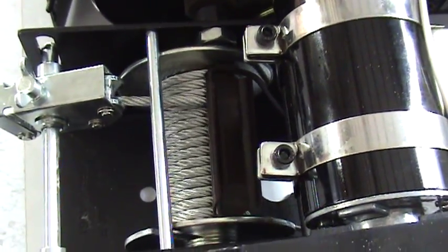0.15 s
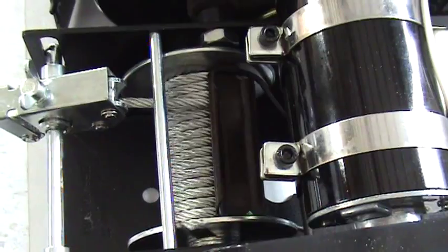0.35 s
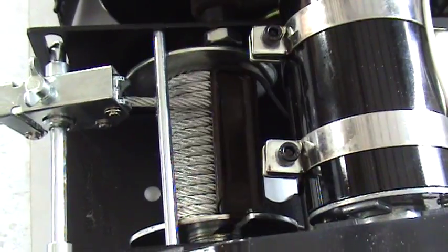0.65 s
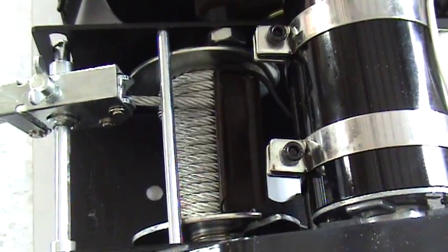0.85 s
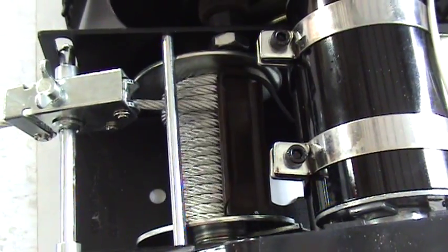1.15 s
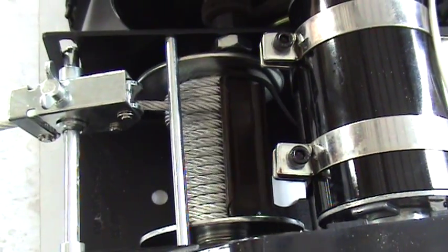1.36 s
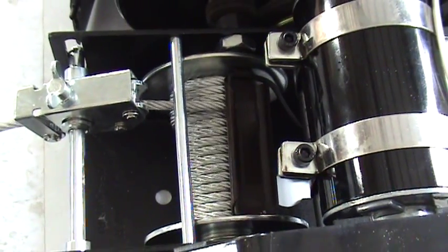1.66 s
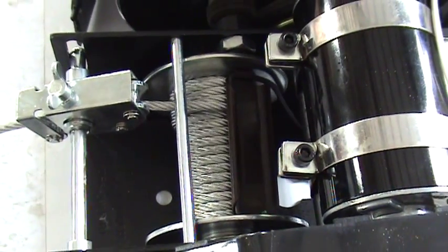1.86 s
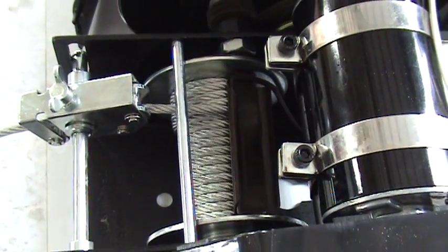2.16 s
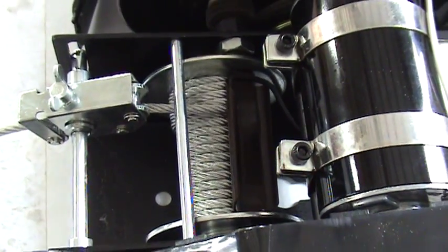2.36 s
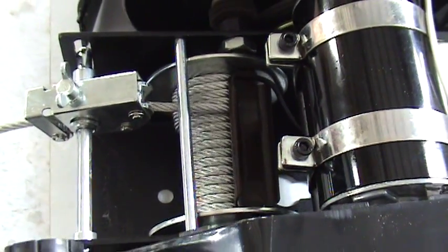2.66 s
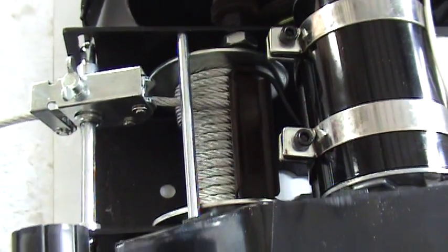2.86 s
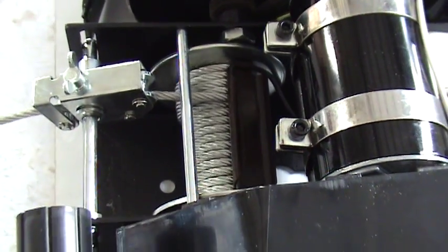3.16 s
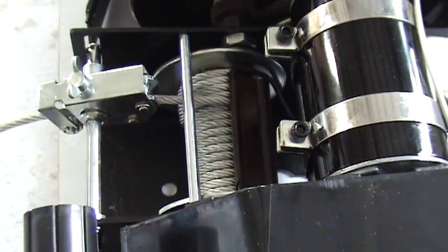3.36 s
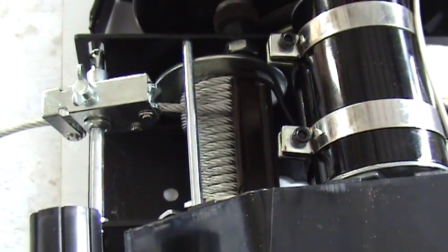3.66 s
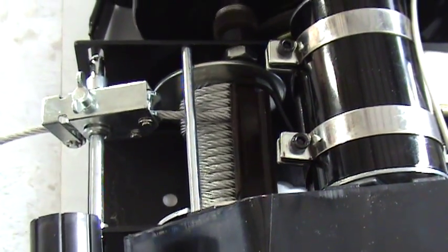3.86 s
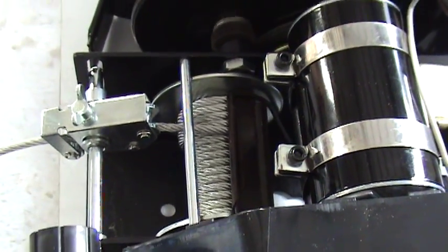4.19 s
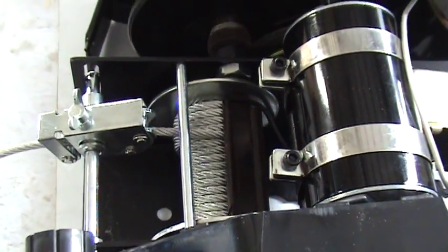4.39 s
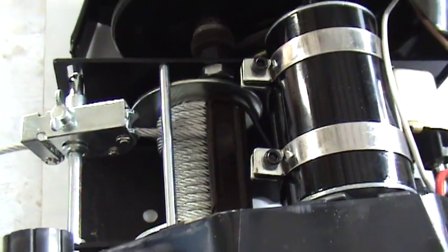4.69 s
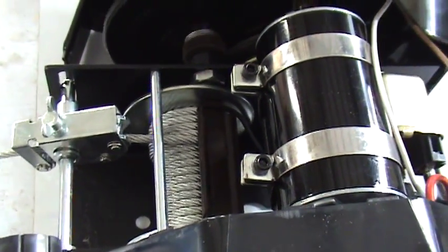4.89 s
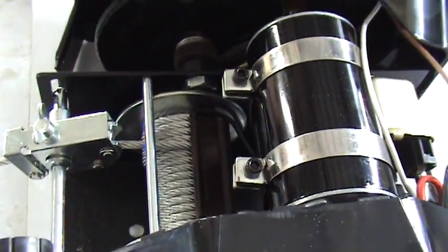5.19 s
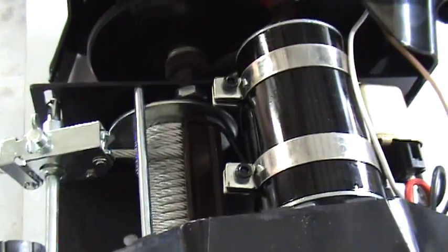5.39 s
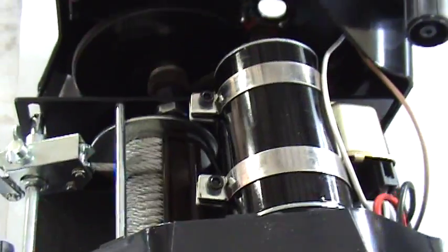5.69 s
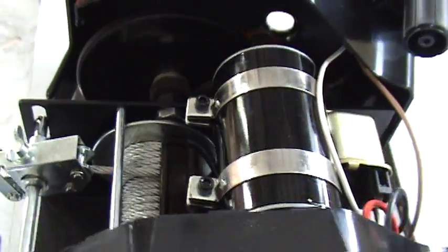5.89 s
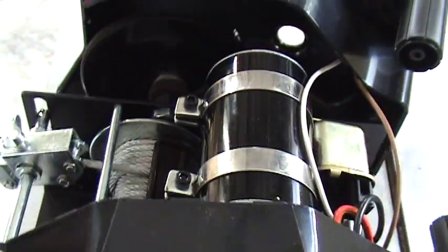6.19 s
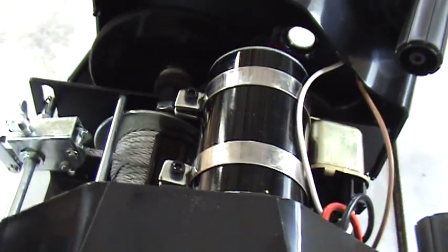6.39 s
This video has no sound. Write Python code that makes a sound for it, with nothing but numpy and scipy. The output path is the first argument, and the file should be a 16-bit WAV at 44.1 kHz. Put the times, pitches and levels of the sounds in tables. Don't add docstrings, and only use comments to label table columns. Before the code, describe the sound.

A small electric winch runs nonstop at close range, a harsh, fast metallic gear rattle with a thin motor whine, then soft handling thumps near the end.

```python
import sys
import numpy as np
from scipy import signal
from scipy.fft import rfft, irfft
from scipy.io import wavfile
from scipy.ndimage import uniform_filter1d

SR = 44100
rng = np.random.default_rng(int(sys.argv[2]) if len(sys.argv) > 2 else 0)


def rack_gain(trim_db):
    fader = np.asarray(trim_db, float)
    return 10 ** (fader / 20)


def transcribe(signal):
    frames = np.atleast_2d(signal).T
    limited = np.clip(frames, -1, 1)
    pcm = np.round(limited * 32767).astype(np.int16)
    wavfile.write(sys.argv[1], SR, pcm)


N = 288414
BINS_HZ = np.arange(1, N // 2 + 2) * SR / N

TEETH_PER_S, PINION_TEETH, DRUM_TEETH = 79.78, 12, 59
CLACK_DB, HOUSING_DB = -22.0, -39
TOOTH_SHARE, TEETH_ALIKE = .21, 3.0

# t/s, lead over a steady run/teeth
LOAD_SLIP = [(0, -.435), (.3, -.595), (1, -.768), (1.9, -.952), (2.6, -.996), (3.4, -.888), (4, -.994),
             (5, -.727), (5.7, -.674), (6.54, -.757)]
OUT_OF_ROUND = [(1, .16, .907), (2, .021, 0), (3, .027, 0)]
# f/Hz, level/dB per Hz
CLACK_TONE = [(700, -5.5), (1000, -13.5), (1400, -12.5), (2150, -9.5), (2350, -3), (3700, -1), (4600, -3),
              (6400, -2.5), (8300, -6.5), (10200, -14), (11100, -21.5), (13000, -31.5), (14000, -35),
              (16000, -37)]
# f/Hz, first strength/0-1, build-up/ms, t60/ms
FRAME_SPREAD = [(1400, .95, 1.0, 28), (2600, .8, 2.6, 18), (3800, .65, 2.7, 20), (5600, .9, 2.4, 25),
                (8300, .9, 2.7, 15), (12000, .9, 1.4, 12)]
CLACK_SHAPING = [(.47, 350), (.2, 12), (.12, .01)]
# f/Hz, level/dB
WEAR_SPREAD = [(3000, .3), (6000, .5), (11000, 1.3)]
# f/Hz, level/dB
ROOM_WASH = [(1000, -4), (3000, -6.5), (7000, -10.5), (10000, -9.5), (14000, -4.6)]
# f/Hz, width/Hz, level/dB
FRAME_MODES = [(2400, 220, 4), (2630, 120, -4), (2800, 260, 4), (2970, 40, -4), (3070, 120, 2),
               (3230, 150, -4), (3690, 200, 4), (4050, 160, 3), (4230, 130, -6), (4850, 120, 2),
               (5100, 150, -2), (5520, 180, 5), (5860, 90, 4), (6120, 90, -3), (6280, 130, 3),
               (6490, 150, 2), (6740, 120, -4), (6910, 140, 3), (7200, 200, -3), (7450, 200, 3),
               (7750, 200, -4), (8000, 300, 3), (8600, 300, -2), (9720, 300, 3), (10800, 400, -3),
               (14700, 300, 4)]
# f/Hz, level/dB per Hz
HOUSING_TONE = [(25, -6), (50, -23), (120, -13.5), (200, -13.5), (280, -8.5), (450, -13.5), (600, -7),
                (680, -41), (790, -27), (1030, -1), (1110, -3), (1200, -17), (2000, -5.5), (3500, -10)]
# f/Hz, width/Hz, level/dB
ROOM_MODES = [(200, 30, -3), (285, 25, 4), (450, 40, -4), (550, 25, 4), (680, 60, -7), (1110, 70, -6),
              (1170, 90, 3), (1400, 50, -3)]
# t/s, f/Hz
SHAFT_SPEED = [(0, 73.2), (.7, 73.5), (2.5, 73.7), (4.5, 73.8), (6.54, 73.6)]
# multiple of shaft speed, level/dB
GEAR_WHINE = [(4, -67.5), (11, -45), (12, -49.5), (13, -59.5), (14, -56.5)]
# multiple of the clack rate, level/dB
TOOTH_HUM = [(1, -68), (2, -59.5), (3, -66.5), (4, -63), (5, -62), (6, -63), (8, -72)]
# share of a turn, level/dB
PINION_BIND = [(0, 0), (.1, -3.5), (.38, -7), (.46, -2), (.56, 3.5), (.72, -2), (.8, 0), (.9, 4.5), (1, 0)]
# t/s, swing/0-1, tilt/-1 to 1
HAND_MOVES = [
    (0, -.05, .05),
    (2, -.05, -.1),
    (3, .03, -.05),
    (4, -.05, -.55),
    (4.8, -.03, .1),
    (5.5, 0, .7),
    (5.76, .03, .55),
    (5.95, .55, .4),
    (6.54, 1.0, -.1),
]
# low f/Hz, high f/Hz, level/dB per swing, level/dB per tilt
FACING_PANELS = [(1400, 1440, 9, .6), (1740, 1890, 5.5, 4), (1976, 2230, -20, .7), (2400, 2900, -4.5, -.7),
                 (3470, 3850, -4.5, 0.5), (3940, 4150, 4, 1.5), (4260, 4480, -3, 6.0),
                 (5300, 5950, -2.0, -1.3), (6080, 6700, 4, -1.5), (7640, 8300, -3.5, -2.5),
                 (8600, 16400, 1, -1), (740, 950, -4.5, 0.5)]
# low f/Hz, high f/Hz, level/dB, loudest at/share of a turn
DRUM_SIDE_PANELS = [(2080, 2200, 0.5, 0.6), (2350, 3240, 0.9, 0.33), (3520, 3850, 1.5, 0.12),
                    (4430, 4600, 1.5, 0.87), (4670, 4700, 0.55, 0.77), (6120, 6700, 1, 1),
                    (6800, 7700, 2.5, 0.97), (8450, 9200, 1.2, 0.92)]
# t/s, peak level/dB, f/Hz
GRIP_THUMPS = [
    (5.125, -46, 140),
    (5.148, -44, 220),
    (5.226, -40, 200),
    (5.29, -43, 60),
    (5.375, -47, 60),
    (5.42, -44, 140),
    (5.51, -40, 95),
    (5.592, -40, 120),
    (5.71, -50, 70),
]
# f/Hz, left-right likeness/-1 to 1
PORT_LIKENESS = [(25, -.5), (70, -.55), (180, .1), (550, .55), (1400, .8), (3000, .92), (7000, .78),
                 (10000, .66), (12000, .98)]
# f/Hz, left over right level/dB
PORT_BALANCE = [(30, -2), (70, -2), (150, -9), (380, -9.5), (950, -8.5), (2380, -1), (6000, 0.5), (9000, 3),
                (15000, -3.5)]
# f/Hz, lead/radians
LEFT_LEAD = [(300, 0), (1460, .7), (4300, .5), (7900, .45), (9000, .05), (11000, 0)]
# lowest f/Hz, share of short stretches left out
TOP_GAPS = [(12000, .04), (13500, .16), (15100, .45)]


def in_time(rows):
    s, *columns = np.transpose(rows)
    return [np.interp(np.arange(N) / SR, s, c) for c in columns]


def at_hz(points, hz, column=1):
    table = np.array(points)
    return np.interp(np.log(hz), np.log(table[:, 0]), table[:, column])


def rms_one(x):
    return x / np.sqrt(np.mean(x ** 2) + 1e-20)


def band(x, low, high):
    return signal.sosfilt(signal.butter(2, [low, high], "band", fs=SR, output="sos"), x)


def drift(rate_hz):
    r = np.exp(-2 * np.pi * rate_hz * 40 / SR)
    white = rng.standard_normal(N // 40 + 2002)
    slow = rms_one(signal.lfilter([1], [1, -2 * r, r * r], white)[2000:])
    return np.interp(np.arange(N) / 40, np.arange(len(slow)), slow)


def wandering(count, length, memory):
    keep = np.exp(-1 / memory)
    fresh = np.sqrt(1 - keep ** 2)
    white = rng.standard_normal((2, count, length))
    white[:, 0] /= fresh
    return signal.lfilter([fresh], [1, -keep], white, axis=1)


def stereo(mid, side, hz):
    alike = np.clip(at_hz(PORT_LIKENESS, hz), -.99, .99)
    half_tilt_db = at_hz(PORT_BALANCE, hz) / 2
    pair = np.sqrt(1 + alike) * mid + np.sqrt(1 - alike) * side * [[1], [-1]]
    return pair * rack_gain(np.array([[half_tilt_db], [-half_tilt_db]]))


def peaks(x, modes):
    sos = []
    for hz, width, db in modes:
        a, w = rack_gain(db / 2), 2 * np.pi * hz / SR
        q = np.sin(w) * width / hz / 2
        middle = -2 * np.cos(w)
        section = np.array([1 + q * a, middle, 1 - q * a, 1 + q / a, middle, 1 - q / a])
        sos.append(section / (1 + q / a))
    return signal.sosfilt(sos, x)


def shifted(x, low, high, db):
    b, a = signal.butter(1, [low, high], "band", fs=SR)
    return x + (rack_gain(db - db.mean()) - 1) * signal.lfilter(b, a, x)


def drum_turns():
    return TEETH_PER_S / DRUM_TEETH * np.arange(N) / SR


def teeth():
    turns = drum_turns()
    wobble = sum(lead * np.cos(2 * np.pi * k * (turns - crest)) for k, lead, crest in OUT_OF_ROUND)
    return DRUM_TEETH * turns + wobble + uniform_filter1d(in_time(LOAD_SLIP)[0], size=3000)


def binding(count):
    return np.interp(count / PINION_TEETH % 1, *np.transpose(PINION_BIND))


def clacks(count, jitter_ms=.15, late_ms=.6, uneven_db=.4):
    blows, length = int(count[-1]) + 1, 640
    delay_ms = late_ms + jitter_ms * rng.standard_normal(blows)
    at = np.searchsorted(count, np.arange(blows)) + delay_ms * SR / 1000
    where = (np.maximum(at, 0).astype(int)[:, None] + np.arange(length)).ravel()

    worn = wandering(DRUM_TEETH, length, TEETH_ALIKE)[:, np.arange(blows) % DRUM_TEETH]
    shape = np.sqrt(TOOTH_SHARE) * worn
    for share, memory in CLACK_SHAPING:
        shape = shape + np.sqrt(share) * wandering(blows, length, memory)
    tooth_wear = rms_one(worn[0, :, :1])
    strength = rack_gain(uneven_db * rng.standard_normal((blows, 1)))
    wash = rng.standard_normal((2, N))

    ms, edges, out = np.arange(length) / SR * 1000, 850 * 2 ** np.arange(0, 4.5, 1 / 3), 0
    for k, (low, high) in enumerate(zip(edges, edges[1:])):
        hz = np.sqrt(low * high)
        start, build, t60 = (at_hz(FRAME_SPREAD, hz, column=c) for c in (1, 2, 3))
        rise = start + (1 - start) * np.minimum(ms / build, 1) ** 2
        decay = rack_gain(-60 * np.maximum(ms - build, 0) / t60)
        rows = band(shape * rise * decay, low, high)
        energy = uniform_filter1d(np.mean(rows ** 2, axis=2), size=9, axis=1)
        rows /= np.sqrt(energy)[..., None]
        rows *= strength * rack_gain(at_hz(WEAR_SPREAD, hz) * tooth_wear)
        direct = rms_one(np.array([np.bincount(where, r.ravel(), N)[:N] for r in rows]))
        diffuse = rack_gain(at_hz(ROOM_WASH, hz)) * rms_one(band(wash, low, high))
        heard = stereo(*rms_one(direct + diffuse), hz)
        out = out + (-1) ** k * np.sqrt(hz) * heard

    spectrum = rfft(out)
    power = np.mean(np.abs(spectrum) ** 2, axis=0) + 1e-9
    even = np.sqrt(uniform_filter1d(power, size=4000) / uniform_filter1d(power, size=520))
    coloured = irfft(spectrum * even * rack_gain(at_hz(CLACK_TONE, BINS_HZ)), N)
    return rack_gain(CLACK_DB) * rms_one(peaks(coloured, FRAME_MODES))


def housing(count, patchy_db=1.0):
    edges, out = 20 * 2 ** np.arange(.3, 7.4, .3), 0
    white = rng.standard_normal((2, 2, N + SR // 4))
    together, load_db = drift(12.0), 0.41 * binding(count)
    for k, (low, high) in enumerate(zip(edges, edges[1:])):
        hz = np.sqrt(low * high)
        patches_db = patchy_db * (together + drift(24.0))
        gain = rack_gain(at_hz(HOUSING_TONE, hz) + patches_db + load_db * (720 < hz < 1150))
        out = out + gain * stereo(*band(white[k % 2], low, high)[:, -N:], hz)
    return rack_gain(HOUSING_DB) * rms_one(out)


def whine(count, wander=1.0, flutter_db=2.5):
    turn, out = 2 * np.pi * np.cumsum(in_time(SHAFT_SPEED)[0]) / SR, 0
    for k, db in TOOTH_HUM:
        tone = rack_gain(db + 3.1 * drift(3.3)) * np.sin(2 * np.pi * k * count + 0.59 * drift(7.6))
        out = out + stereo(tone, np.zeros(N), k * TEETH_PER_S)
    for k, db in GEAR_WHINE:
        swell = rack_gain(db + 1.37 * binding(count) + flutter_db * drift(33.0))
        tone = swell * np.sin(k * turn + wander * drift(7.7))
        out = out + stereo(tone, .5 * np.roll(tone, 14), k * SHAFT_SPEED[0][1])
    return out


def panels(rattle):
    swing, tilt = in_time(HAND_MOVES)
    for low, high, swing_db, tilt_db in FACING_PANELS:
        rattle = shifted(rattle, low, high, swing_db * swing + tilt_db * tilt)
    for low, high, db, crest in DRUM_SIDE_PANELS:
        rattle = shifted(rattle, low, high, db * np.cos(2 * np.pi * (drum_turns() - crest)))
    return rattle


def thumps():
    out, t = np.zeros((2, N)), np.arange(N) / SR
    for s, db, hz in GRIP_THUMPS:
        cycles = (t - s) * hz
        push = np.sin(2 * np.pi * cycles) * np.exp(-(cycles / .55) ** 2)
        out += rack_gain(db) * push * [[1], [-.4]]
    return out


def scene():
    count = teeth()
    in_room = peaks(clacks(count) + housing(count), ROOM_MODES)
    return panels(in_room + whine(count)) + thumps()


def top_cut(x):
    return signal.sosfilt(signal.butter(12, 15780, fs=SR, output="sos"), x)


def record(dry):
    spectrum = rfft(dry) * np.exp(.5j * at_hz(LEFT_LEAD, BINS_HZ) * [[1], [-1]])
    ports = irfft(spectrum, N)
    luck, kept = rng.random(N // 1024 + 1), 1.
    for hz, share in TOP_GAPS:
        gate = uniform_filter1d(np.repeat(luck > share, 1024)[:N] * 1., size=900)
        ports += (gate - kept) * irfft(spectrum * (BINS_HZ > hz), N)
        kept = gate
    mix = .75 * np.tanh(ports / .75)
    return top_cut(mix)


dry = scene()
out = record(dry)
transcribe(out)
```